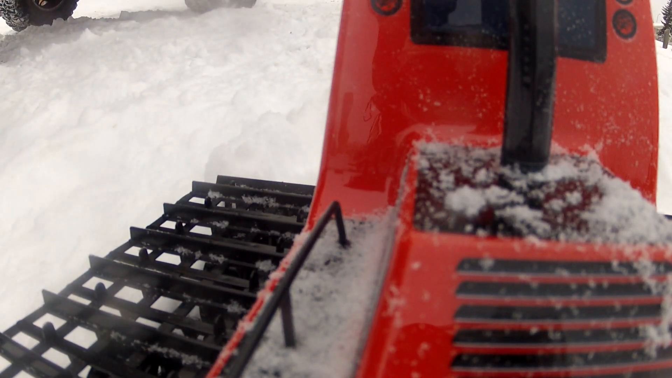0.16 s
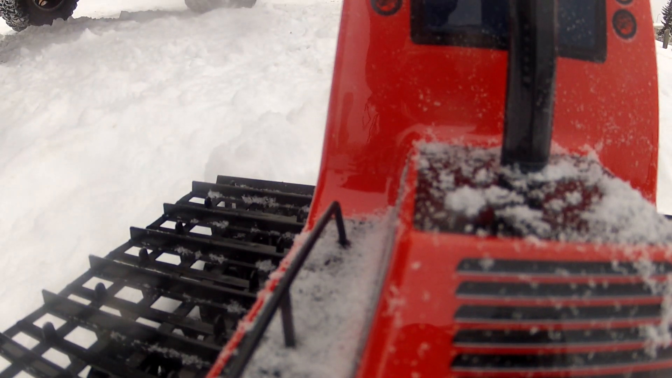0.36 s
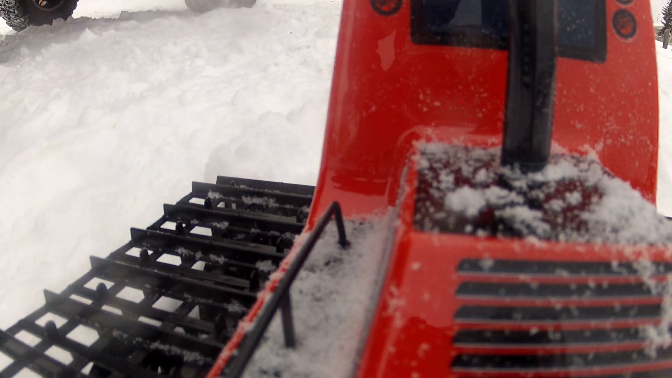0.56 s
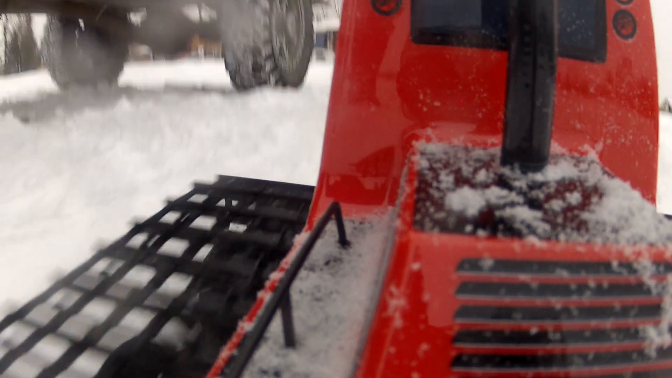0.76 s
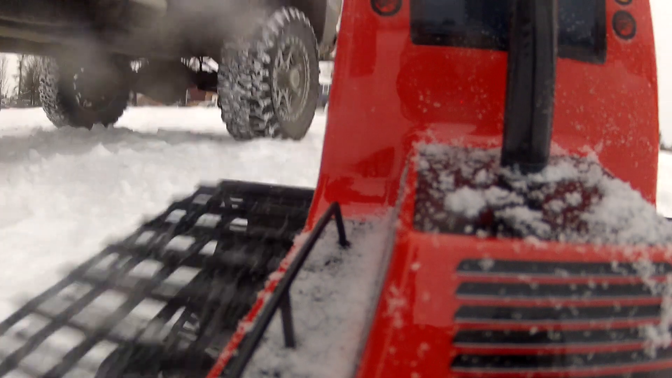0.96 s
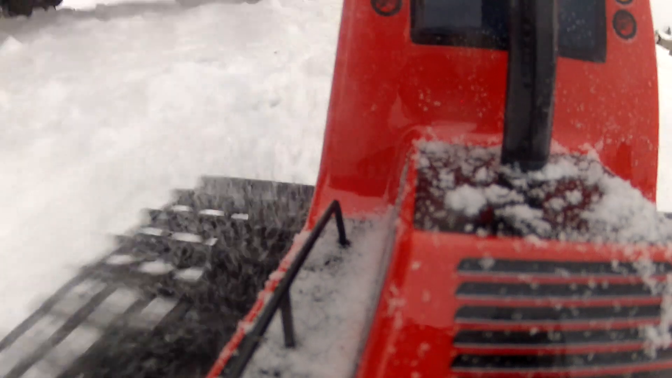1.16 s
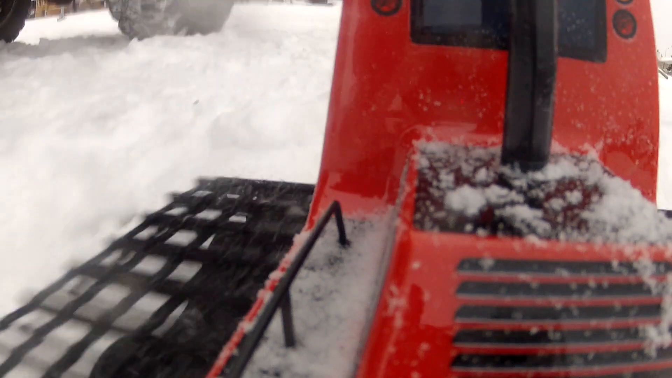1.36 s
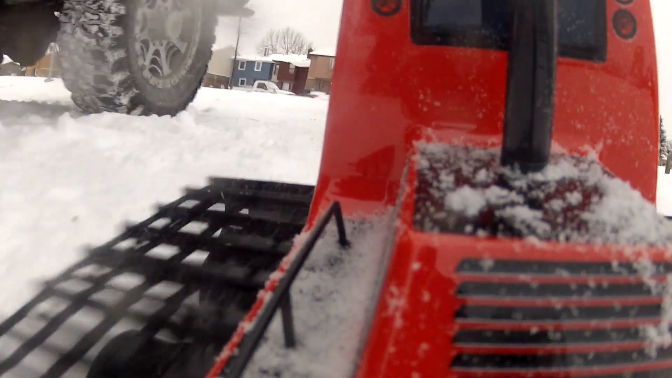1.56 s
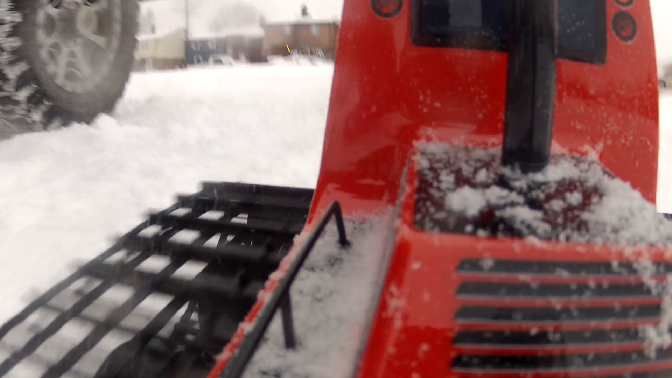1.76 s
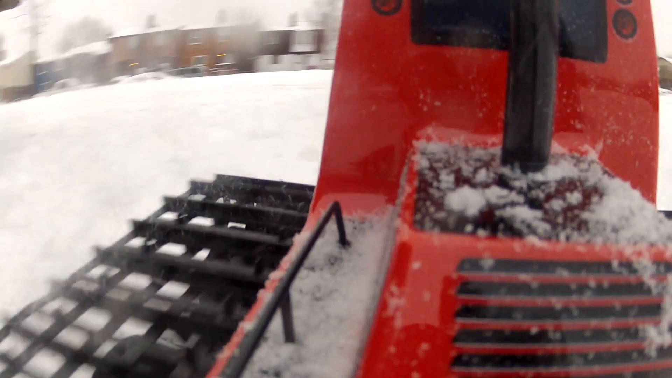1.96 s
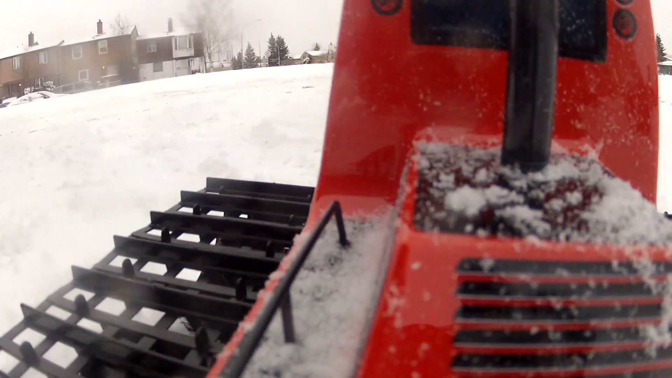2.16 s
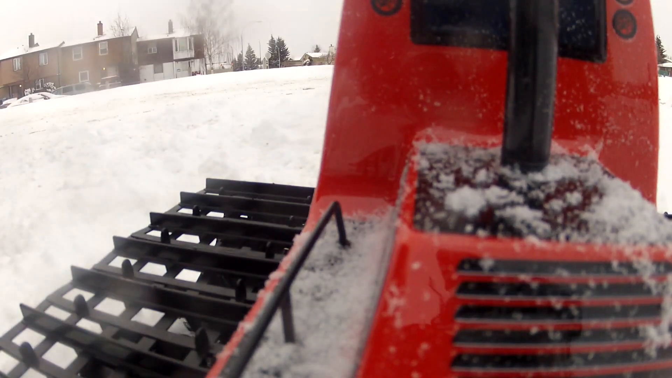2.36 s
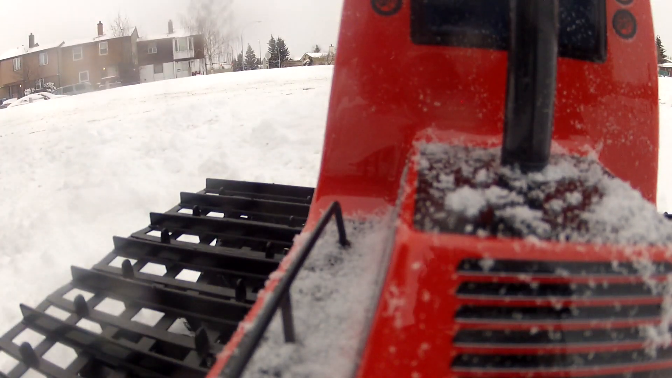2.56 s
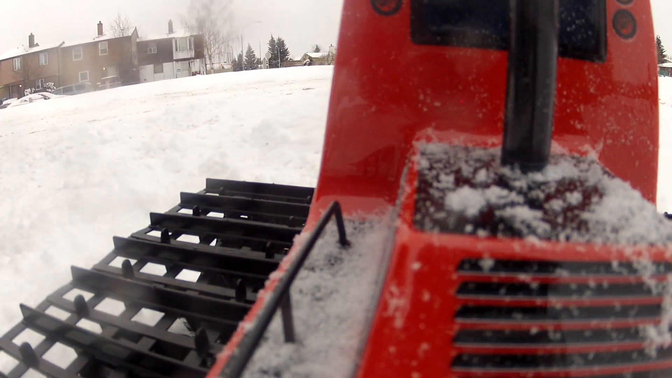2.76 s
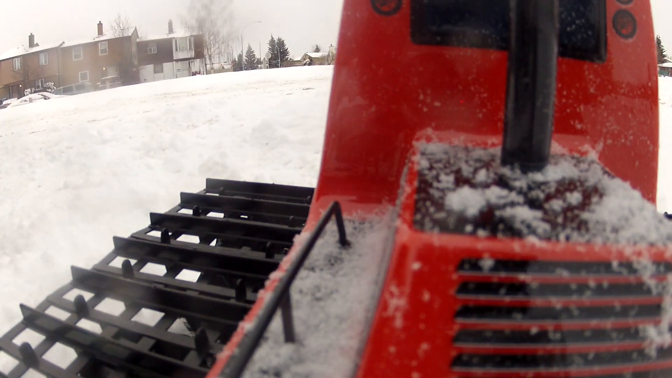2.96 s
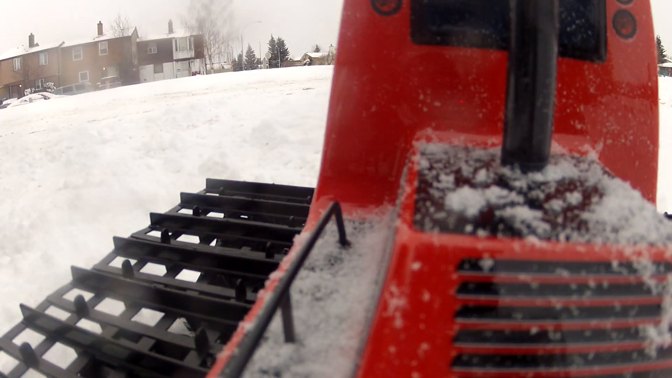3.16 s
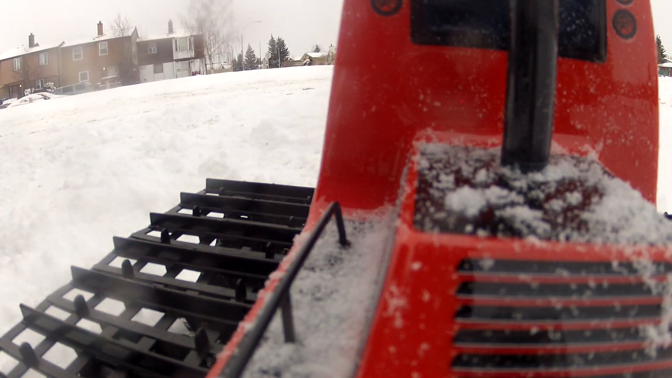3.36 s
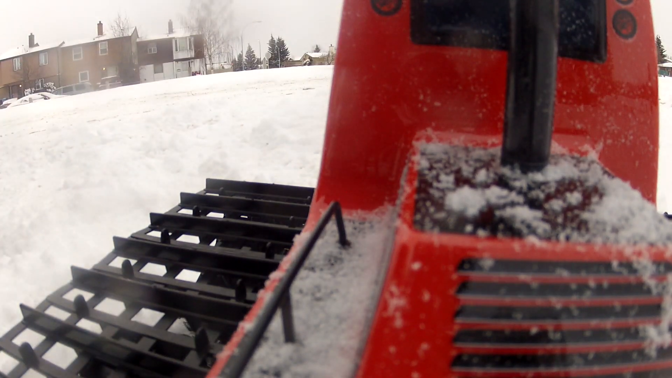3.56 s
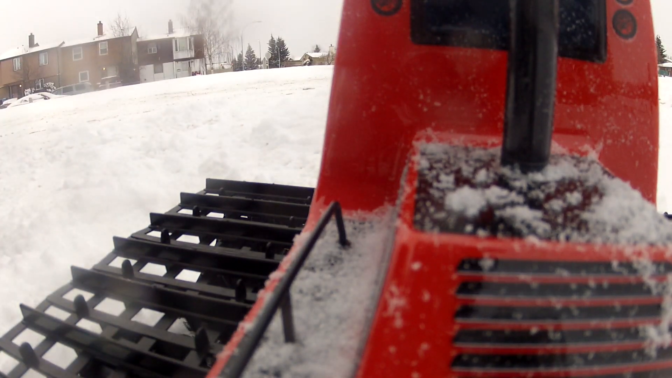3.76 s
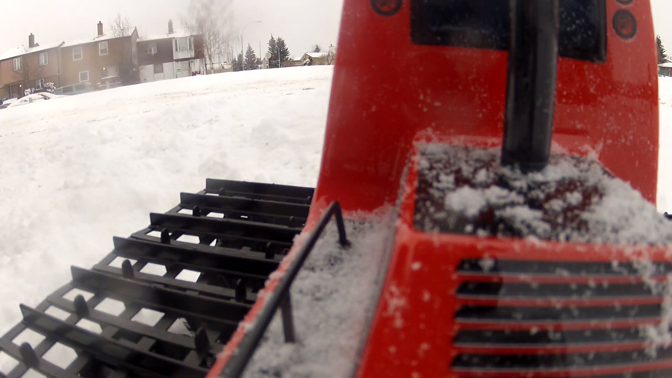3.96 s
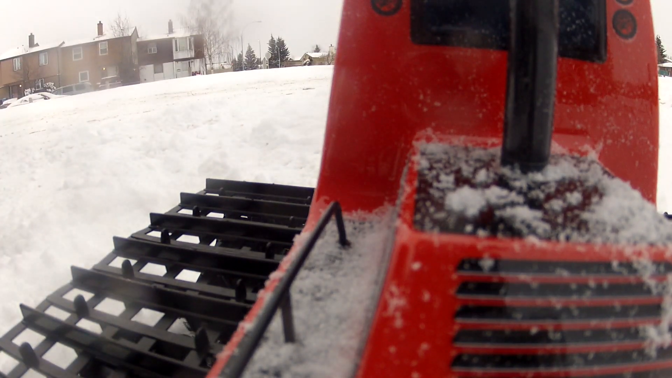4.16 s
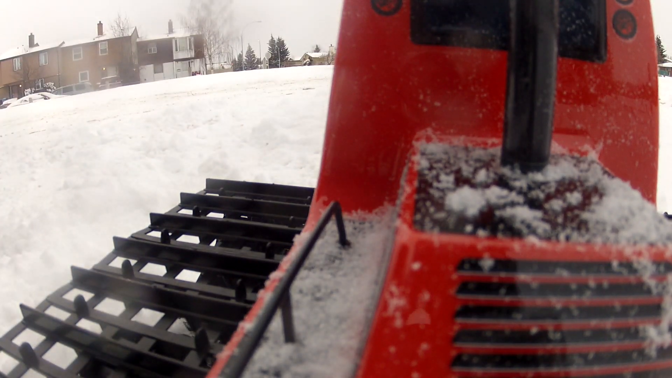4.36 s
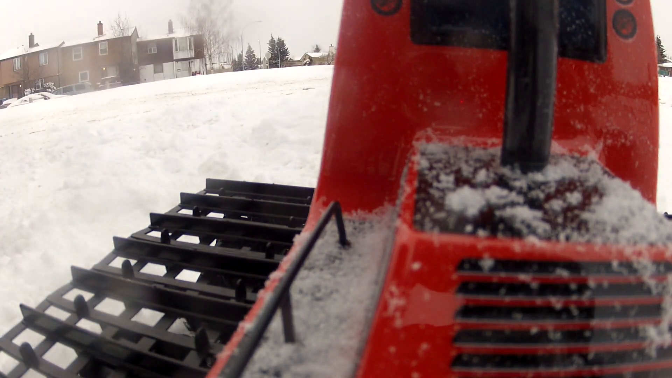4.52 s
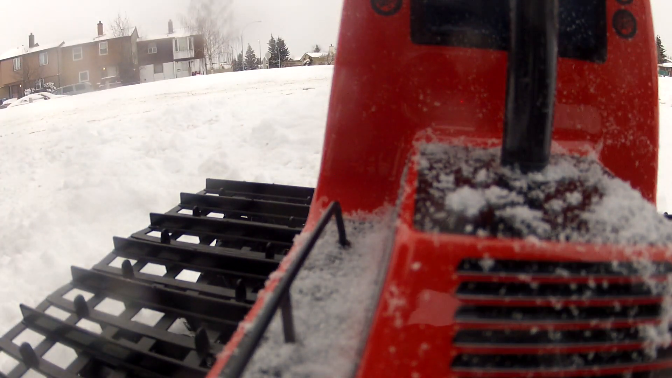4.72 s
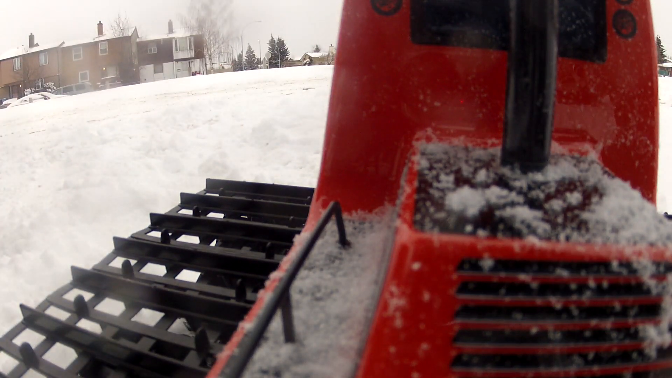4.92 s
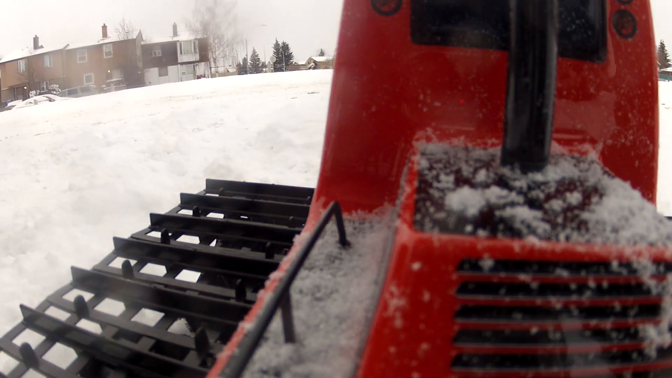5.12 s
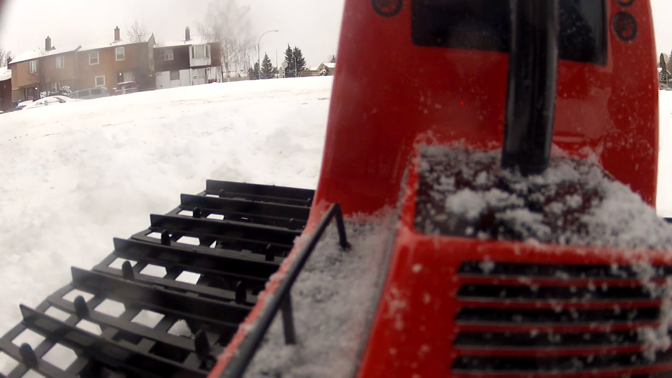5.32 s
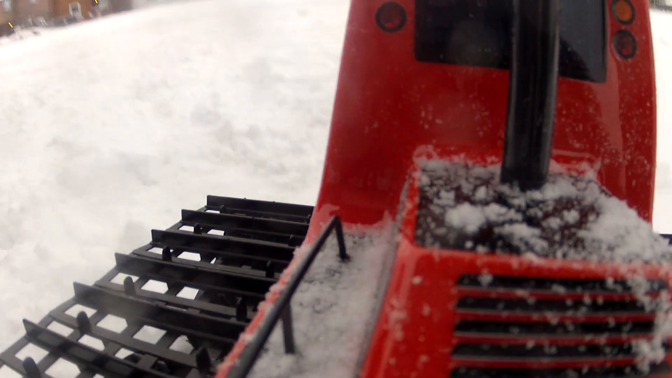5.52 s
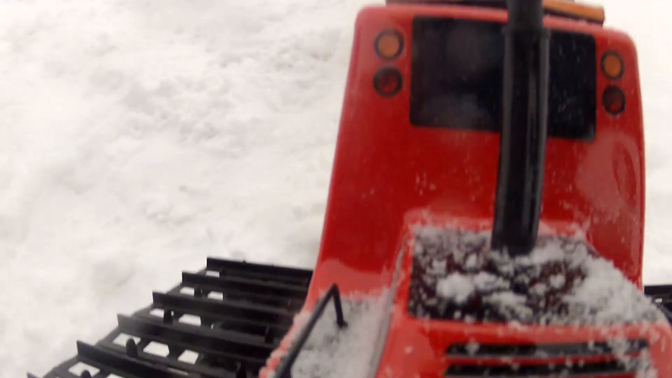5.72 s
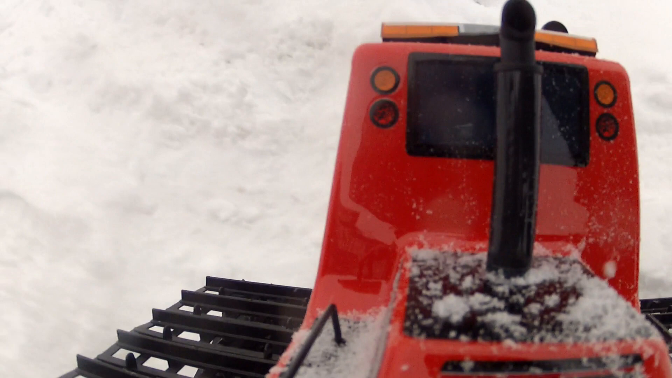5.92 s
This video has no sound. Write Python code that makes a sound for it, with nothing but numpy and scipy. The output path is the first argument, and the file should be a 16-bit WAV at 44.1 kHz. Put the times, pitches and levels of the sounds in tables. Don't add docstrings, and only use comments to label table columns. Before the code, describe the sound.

A small electric motor kicks in with clattering jolts, its coarse whine rising as tracks shake the plastic shell, then cuts off with a few coasting clicks. Quiet outdoor air follows, broken by faint ticks and a small rattle. Finally a hand grips and drags on the case, with a short rising whir, cracks and thumps. Very close, boxy, lo-fi contact-like sound with gritty treble.

```python
import sys
import numpy as np
from scipy import signal
from scipy.fft import rfft, irfft
from scipy.io import wavfile
from scipy.ndimage import uniform_filter1d

SR = 44100
rng = np.random.default_rng(int(sys.argv[2]) if len(sys.argv) > 2 else 0)


def persist_wave(psi):
    counts = np.round(np.clip(psi, -1, 1) * 32767).astype(np.int16)
    wavfile.write(sys.argv[1], SR, np.atleast_2d(counts).T)


def nominal_scale(level):
    x = np.asarray(level, float) / 20
    return 10 ** x


N = 268392

# (frequency [Hz], level [dB per Hz])
FLUTTER_COLOUR = [(12, -36), (20, -4), (85, -5), (193, 0), (327, -5), (473, -9.5), (597, -18), (800, -23),
                  (1040, -47), (1760, -120)]
# (frequency [Hz], level [dB per Hz])
HISS_COLOUR = [(350, -42), (600, -6.5), (778, -5), (1130, -10), (1250, -9), (1960, -11.5), (4900, -12.5),
               (6000, -21), (7800, -56.5), (13200, -120)]
# (middle [s], half length [s], lift of flutter [dB], lift of hiss [dB])
GUSTS = [
    (3.601, 0.11, -3.5, 3),
    (3.802, 0.22, 2.5, 2.5),
    (4.12, 0.056, 6, 2.5),
    (4.42, .14, 6, 8),
    (4.847, 0.05, 1, 7.5),
    (5.602, 0.72, -3, 17),
]
FLUTTER_DB, HISS_DB = -64, -69.5

# (time [s], peak [dB], frequency [Hz], time to fall 60 dB [s])
SWINGS = [(0.449, -46.5, 46.3, 0.38), (0.452, -55.5, 129, .2), (.449, -42.5, 2860, 0.025),
          (.45, -55, 624, .04), (0.459, -55, 2780, 0.1), (0.463, -62, 1690, .08), (.65, -11.5, 1940, .1),
          (1.952, -10.5, 451.5, 0.037), (2.154, -17.5, 45, 0.57), (3.777, -38.5, 45, 0.57),
          (3.778, -41, 118, 0.15), (5.0, -56, 45, .5), (5.264, -20.5, 255, 0.021),
          (5.7478, 2.5, 136.3, 0.034), (5.754, -17.5, 150, 0.15), (5.828, -24, 111, 0.045),
          (5.898, -4.5, 113, 0.046), (5.896, -4, 1199, 0.022), (5.897, -8.5, 503, .03),
          (5.897, -6.5, 780, .025), (5.9, -36.5, 1300, 0.14)]

# (frequency [Hz], width [Hz], level [dB])
CASE_MODES = [(640, 160, -5), (1070, 89, 1.5), (1340, 96, -2), (1764, 190, 3.5), (2050, 540, -4),
              (2780, 130, -11.5)]
# (time [s], peak [dB], ring [Hz], crack [dB])
JOLTS = [
    (0.449, -45.5, 1620, -60),
    (0.642, -7, 970, -30),
    (0.656, -8.5, 1900, -36),
    (1.955, -6, 1228, -27),
]
# (time [s], peak [dB], ring [Hz], crack [dB])
TICKS = [
    (2.281, -47, 1416, -41),
    (2.301, -44, 1398, -55),
    (2.326, -44, 1350, -58),
    (3.399, -54.5, 740, -45),
    (3.814, -52.5, 818, -75.5),
    (3.844, -45, 1120, -72),
    (3.951, -49, 1650, -71),
    (3.974, -52, 1610, -70.5),
    (4.529, -54, 2200, -43),
    (4.858, -49, 1664, -64),
]
# (time [s], peak [dB], ring [Hz], crack [dB])
TWITCH = [
    (3.737, -31, 736, -67),
    (3.75, -36.5, 1880, -59),
    (3.772, -25.5, 1350, -42.5),
    (3.787, -29, 1020, -64),
    (3.869, -41, 1710, -80),
]
# (time [s], peak [dB], ring [Hz], crack [dB])
KNOCKS = [(5.055, -41, 2750, -58), (5.113, -39, 1100, -60), (5.209, -18, 1290, -48), (5.243, -11, 1140, -2),
          (5.264, -3, 1260, 2), (5.3, -19, 2360, -18), (5.318, -21, 1840, -23), (5.356, -16.5, 1800, -11),
          (5.471, -21, 1160, -38), (5.499, -21, 890, -34), (5.528, -9, 2220, -34),
          (5.539, -11.5, 1920, -32), (5.661, -9, 2300, -24), (5.709, -9, 1250, -36),
          (5.737, -13, 1370, -16), (5.746, -4.5, 1100, -8), (5.866, -20, 1190, -50),
          (5.883, -15, 1730, -44), (5.895, 5, 1200, 0), (5.936, -46, 1270, -46)]
# (time [s], peak [dB], ring [Hz], crack [dB])
SNAPS = [
    (1.216, 1, 1352, -31),
    (5.825, 0.5, 1740, -12.5),
]
JOLT_T60_S, TICK_T60_S, TWITCH_T60_S, KNOCK_T60_S, SNAP_T60_S = 0.057, 0.02, 0.05, 0.016, 0.007
BLOW_RISE_S, TWITCH_RISE_S = 0.001, 0.002

SPIN_S, SPIN_FOR_S, SPIN_UP_S = 5.135, 0.22, 0.052
SPIN_FROM_HZ, SPIN_TOP_HZ, SPIN_DB = 270, 1084, -38.5
BUZZ_HZ, BUZZ_DB = 1060, -39

# (frequency [Hz], level [dB per Hz])
TOUCH_COLOUR = [(210, -47), (350, -16), (568, -22), (810, -4), (1210, -5), (1400, -9), (1590, -3.5),
                (2350, -11), (2800, 3), (5900, -52), (7670, -71), (13000, -120)]
# (frequency [Hz], level [dB per Hz])
GRASP_COLOUR = [(210, -51), (350, -24), (589, -20), (687, -3), (933, -20), (1050, 3.5), (1630, -16.5),
                (2090, -5), (2430, -32), (5900, -47.5), (7670, -86), (13000, -120)]
# (frequency [Hz], level [dB per Hz])
DRAG_COLOUR = [(210, -30), (350, -8.5), (782, -5.5), (1050, -1.5), (1280, -0.5), (1790, 2.5), (2400, 0),
               (2900, -9), (3550, -2), (4190, -11), (5000, -11), (5900, -19), (7670, -54), (13000, -120)]
TOUCH_END_S, GRASP_END_S = 5.135, 5.243
# (time [s], length [s], rub [dB], dry edge [dB], sway [dB])
GRIPS = [(4.995, 0.042, -46.5, -65, -59), (5.053, 0.045, -48, -71, -52), (5.137, 0.098, -27.5, -49, -34.5),
         (5.246, .016, -26.5, -22.5, -28), (5.278, .112, -27, -34.5, -32.5),
         (5.393, .045, -30.5, -36, -39.5), (5.44, 0.064, -37, -42.5, -38),
         (5.505, 0.088, -29, -31.5, -35.5), (5.59, .045, -34, -33.5, -31.5), (5.638, .058, -25, -26, -30.5),
         (5.7, 0.04, -30, -46, -33.5), (5.755, 0.071, -40, -51, -28.5), (5.84, 0.044, -44, -51, -34),
         (5.925, .17, -40, -54.5, -41.5)]
ATTACK_S, RELEASE_S = 0.0052, 0.0088

# (frequency [Hz], level [dB per Hz])
GRIND_COLOUR = [(120, -39), (200, -9), (339, -16.5), (565, -12.5), (680, -8.5), (904, -7.5), (1090, -5.5),
                (1330, -1.5), (1980, -8), (2350, -10.5), (2670, -10), (3070, -25.5), (3540, -28),
                (5060, -35), (6000, -41), (7800, -76.5), (13200, -120)]
# (frequency [Hz], width [Hz], level [dB])
CHASSIS_MODES = [(42.7, 20, -1.5), (93, 37, -1.5), (150, 110, -8.5)]
# (frequency [Hz], width [Hz], level [dB])
SHELL_MODES = [(568, 120, -10.5), (890, 84, -6), (1450, 51, -8), (1730, 110, 0), (1940, 210, -1),
               (2200, 94, -8.5), (2590, 38, -9.5), (2850, 110, -11), (3519, 740, -17.5), (4410, 1600, -27)]
# (time [s], gear mesh [Hz], load [dB])
RUN = [
    (0.63, 741, -24),
    (0.659, 783, -13),
    (0.736, 816.5, -17),
    (0.8, 890, -13.5),
    (0.87, 1198, -15.5),
    (1.2, 1324, -16.5),
    (1.9, 1350, -15.5),
    (2.222, 1343, -23),
    (2.256, 1360, -45.5),
]
# (time [s], length [s], level [dB])
COAST = [
    (2.25, 0.02, -50),
    (2.272, 0.019, -40.5),
    (2.3, .006, -52),
    (2.326, 0.0046, -45.5),
    (2.35, 0.014, -69),
]
WHINE_DB, SIZZLE_DB, RUMBLE_DB, FULL_LOAD_DB = -22, -35, -21.5, -16
SIZZLE_GROWS, RUMBLE_GROWS = 1.3, 0.28
WHINE_FADE_DB, WHINE_IN_S = -11.5, 0.072
THROTTLE_OFF_S, SLACK_DB = 1.93, -7
SETTLE_DB_PER_S, SETTLED_DB = -140, -66.5
MESH_WANDER, MESH_FLUTTER = 0.012, 0.04

# (time [s], change [dB], half-way back after [s])
DUCKS = [
    (1.222, -13, 0.05),
    (5.27, 3, 0.025),
    (5.83, -12.5, .02),
    (5.9, -21.5, 0.017),
]
DUCK_IN_S = 0.008
HOLD_UP, HOLD_DOWN, HOLD_STEPS = 40, 147, 4


def unit(x):
    return x / np.sqrt(np.mean(x ** 2))


def colour(x, points):
    hz, db = np.transpose(points)
    f = np.maximum(np.arange(N // 2 + 1) * SR / N, 1)
    gain = nominal_scale(np.interp(np.log(f), np.log(hz), db, left=-90, right=-90))
    return unit(irfft(rfft(x) * gain, N))


def ring(x, hz, width_hz):
    return signal.lfilter(*signal.iirpeak(hz, hz / width_hz, SR), x)


def body(x, modes):
    return unit(sum((-1) ** k * nominal_scale(db) * ring(x, hz, w) for k, (hz, w, db) in enumerate(modes)))


def walk(rate):
    k = int(SR / rate)
    held = np.repeat(rng.standard_normal(N // k + 1), k)
    return unit(uniform_filter1d(uniform_filter1d(held, k), k)[:N])


def grit(spread_db, burst_db, burst_rate):
    size = np.minimum(rng.exponential(size=N), 4)
    return rng.standard_normal(N) * nominal_scale(spread_db * size + burst_db * walk(burst_rate))


def strand(phase, width_hz):
    return unit(walk(width_hz) * np.sin(phase) + walk(width_hz) * np.cos(phase) + 0.23 * np.sin(phase))


def split(x):
    edge = signal.sosfiltfilt(signal.butter(4, 3000, "highpass", fs=SR, output="sos"), x)
    return x - edge, edge / uniform_filter1d(edge ** 2, size=6000) ** 0.5


def bursts(rows):
    t = np.arange(N) / SR
    return sum(np.clip((t - s) / ATTACK_S, 0, 1) * np.exp(-np.maximum(t - s - length, 0) / RELEASE_S)
               * nominal_scale(np.array(db))[:, None] for s, length, *db in rows)


def air():
    t = np.arange(N) / SR
    flutter_lift, hiss_lift = sum(np.clip(1 - ((t - s) / half) ** 2, 0, 1) * np.array(db)[:, None]
                                  for s, half, *db in GUSTS)
    flutter = colour(grit(spread_db=0.5, burst_db=1.2, burst_rate=25), FLUTTER_COLOUR)
    hiss = colour(grit(spread_db=0.5, burst_db=0.6, burst_rate=30), HISS_COLOUR)
    return nominal_scale(FLUTTER_DB + flutter_lift) * flutter + nominal_scale(HISS_DB + hiss_lift) * hiss


def thuds():
    out, t = np.zeros(N + SR), np.arange(SR // 2) / SR
    for s, db, hz, t60 in SWINGS:
        i = int(s * SR)
        out[i:i + len(t)] -= nominal_scale(db) * np.sin(2 * np.pi * hz * t) * np.exp(-np.log(1000) * t / t60)
    return out[:N]


def knocks():
    out, t = np.zeros(N + SR), np.arange(SR // 2) / SR
    soft = signal.butter(4, 3300, fs=SR, output="sos")
    kinds = [(JOLTS, JOLT_T60_S, BLOW_RISE_S), (TICKS, TICK_T60_S, BLOW_RISE_S),
             (TWITCH, TWITCH_T60_S, TWITCH_RISE_S), (KNOCKS, KNOCK_T60_S, BLOW_RISE_S),
             (SNAPS, SNAP_T60_S, BLOW_RISE_S)]
    for table, t60, rise in kinds:
        fade = np.exp(-np.log(1000) * t / t60) + 0.016 * np.exp(-t / 0.012)
        for s, db, hz, crack_db in table:
            rattle = rng.standard_normal(len(t)) * np.minimum(t / rise, 1) * fade
            tone = unit(ring(rattle, hz, 0.17 * hz)) + 0.54 * body(rattle, CASE_MODES)
            tone = signal.sosfilt(soft, tone)
            crack = ring(ring(rattle, 4300, 2600), 3400, 4000)
            i = int(s * SR)
            out[i:i + len(t)] += nominal_scale(db - 0.5) * tone / np.abs(tone).max()
            out[i:i + len(t)] += nominal_scale(crack_db - 3.5) * crack / np.abs(crack).max()
    return out[:N]


def spin():
    t = np.maximum(np.arange(N) / SR - SPIN_S, 0)
    hz = SPIN_TOP_HZ - (SPIN_TOP_HZ - SPIN_FROM_HZ) * np.exp(-t / SPIN_UP_S)
    mesh = strand(2 * np.pi * np.cumsum(hz) / SR, 110)
    buzz = strand(2 * np.pi * BUZZ_HZ * t, 120) + nominal_scale(-1.5) * strand(4 * np.pi * BUZZ_HZ * t, 120)
    mesh_gain, buzz_gain = bursts([(SPIN_S, SPIN_FOR_S, SPIN_DB, BUZZ_DB)])
    return mesh_gain * mesh + buzz_gain * buzz


def hand():
    t = np.arange(N) / SR
    rub_gain, edge_gain, sway_gain = bursts(GRIPS)
    slips = grit(spread_db=2.0, burst_db=1.8, burst_rate=90)
    touch, grasp, drag = [colour(slips, c) for c in (TOUCH_COLOUR, GRASP_COLOUR, DRAG_COLOUR)]
    rub = np.select([t < TOUCH_END_S, t < GRASP_END_S], [touch, grasp], drag)
    rub, edge = split(rub)
    pull = grit(spread_db=1.0, burst_db=1.2, burst_rate=18)
    sway = body(pull, [(45, 14.7, -1.5), (101.0, 65, -5.5), (211.4, 111, -9.0)])
    sway = unit(signal.lfilter(*signal.butter(2, 450, fs=SR), sway))
    return rub_gain * rub + nominal_scale(2.0) * edge_gain * edge + nominal_scale(0.5) * sway_gain * sway


def drive():
    t = np.arange(N) / SR
    s, hz, load_db = np.transpose(RUN)
    hz = np.interp(t, s, hz) * (1 + MESH_WANDER * walk(8.7) + MESH_FLUTTER * walk(70))
    load_db = np.interp(t, s, load_db)
    extra_db = load_db - FULL_LOAD_DB
    started = np.clip((t - s[0]) / 0.0026, 0, 1)
    on = started * (t <= s[-1])
    since_start, since_stop = np.maximum(t - s[0], 0), np.maximum(t - s[-1], 0)

    phase = 2 * np.pi * np.cumsum(uniform_filter1d(hz, size=600)) / SR
    whine = strand(phase, 170) + nominal_scale(-13) * strand(2 * phase, 300)
    whine_db = WHINE_DB + extra_db + 1.8 * walk(35)
    whine_db += WHINE_FADE_DB * np.exp(-since_start / WHINE_IN_S)
    whine_db += SLACK_DB * np.clip((t - THROTTLE_OFF_S) / 0.04, 0, 1)

    turn = 1 + 0.16 * np.sin(phase / 12)
    teeth = turn * grit(spread_db=2.0, burst_db=1.3, burst_rate=110)
    panels = np.zeros(N)
    for f, width, db in SHELL_MODES:
        swell_db = 4.2 * np.clip(walk(28), -3, 1.8)
        panels += nominal_scale(db + swell_db) * ring(ring(teeth, f, width), f, 3 * width)
    grind, sizzle = split(colour(teeth, GRIND_COLOUR) + nominal_scale(-10.5) * unit(panels))

    rumble = body(grit(spread_db=-0.5, burst_db=-1.0, burst_rate=15), CHASSIS_MODES)
    rumble = unit(signal.sosfilt(signal.butter(2, [32, 210], "bandpass", fs=SR, output="sos"), rumble))
    rocking = nominal_scale(RUMBLE_DB + RUMBLE_GROWS * extra_db + SETTLE_DB_PER_S * since_stop)
    rocking += nominal_scale(SETTLED_DB) * np.exp(-since_stop / 0.52)

    gears = nominal_scale(whine_db) * whine + nominal_scale(load_db - 2.0) * grind
    gears += nominal_scale(SIZZLE_DB + SIZZLE_GROWS * extra_db) * sizzle
    coasting = bursts(COAST)[0] * (grind + nominal_scale(-22) * sizzle)
    return on * gears + coasting + started * rocking * rumble


def ducking():
    t = np.arange(N) / SR
    return nominal_scale(sum(db * np.clip((t - s) / DUCK_IN_S, 0, 1) / (1 + np.maximum(t - s, 0) / back)
                   for s, db, back in DUCKS))


def scene():
    return (ducking() * (air() + knocks() + spin() + hand() + drive()) + thuds())[None]


def starve(x, mask_db):
    f, _, z = signal.stft(x, SR, nperseg=1024)
    power = uniform_filter1d(np.abs(z) ** 2, size=5, axis=0)
    middle = power[(f > 800) & (f < 2500)].mean(axis=0)
    weak = (power < middle * nominal_scale(2 * mask_db)) & (f[:, None] > 3000)
    return signal.istft(z * ~weak, SR, nperseg=1024)[1][:N]


def top_cut(x):
    return signal.sosfilt(signal.butter(12, 16470, fs=SR, output="sos"), x)


def record(dry):
    port = dry[0] - 0.6 * ring(dry[0], 4150, 310)
    port = signal.sosfilt(signal.ellip(6, 0.2, 60, 5650, fs=SR, output="sos"), port)
    slow = signal.resample_poly(port, HOLD_UP, HOLD_DOWN, window=("kaiser", 8))
    steps = np.repeat(np.clip(slow, -0.95, 0.95), HOLD_STEPS)
    x = signal.resample_poly(steps, HOLD_DOWN, HOLD_UP * HOLD_STEPS)[:N]
    x = np.pad(x, (0, N - len(x)))
    x = signal.sosfilt(signal.ellip(10, 0.2, 80, 15350, fs=SR, output="sos"), x)
    mix = np.clip(starve(x, mask_db=-41), -0.96, 0.96)
    return top_cut(mix[None])


dry = scene()
out = record(dry)
persist_wave(out)
```